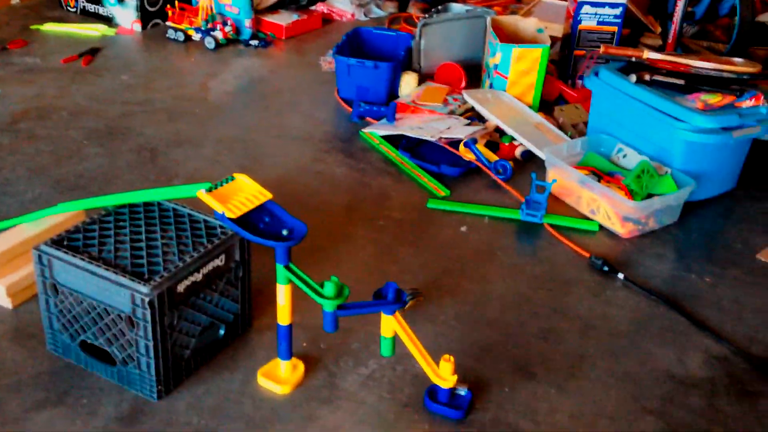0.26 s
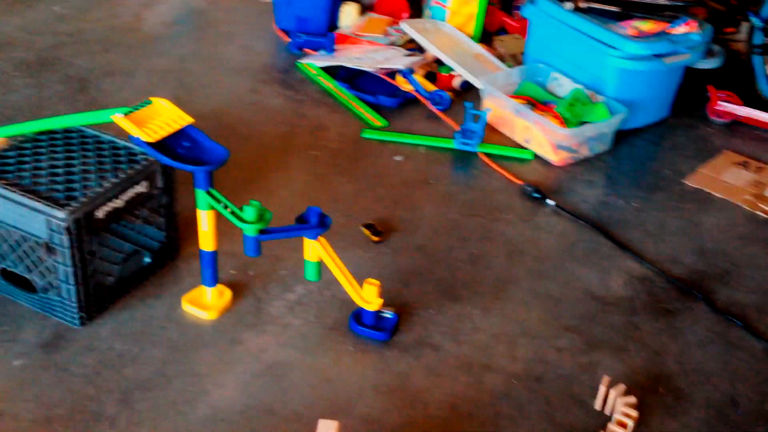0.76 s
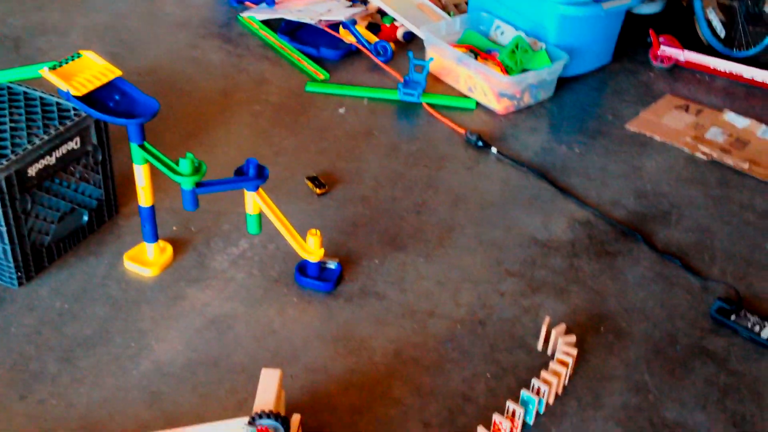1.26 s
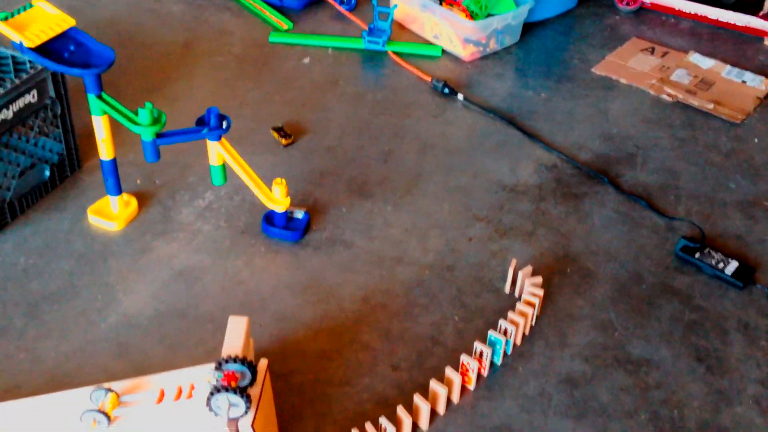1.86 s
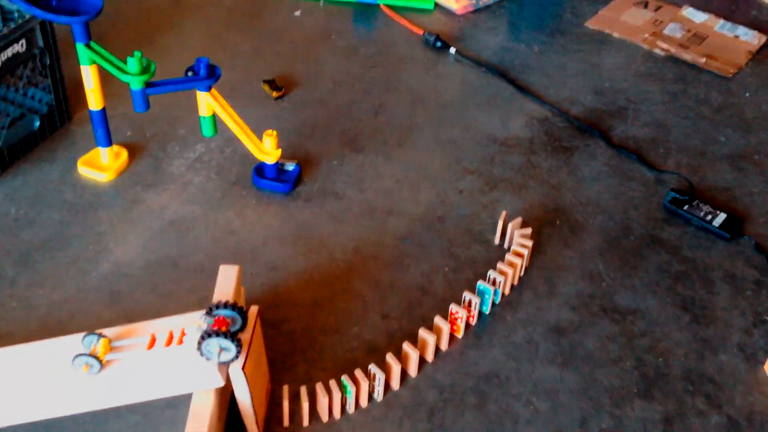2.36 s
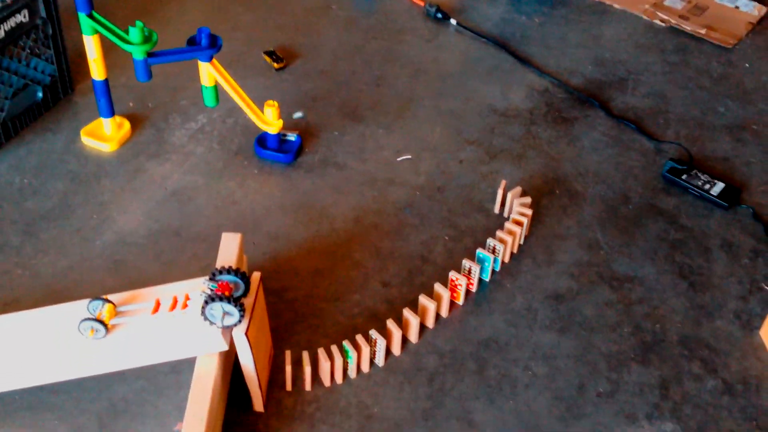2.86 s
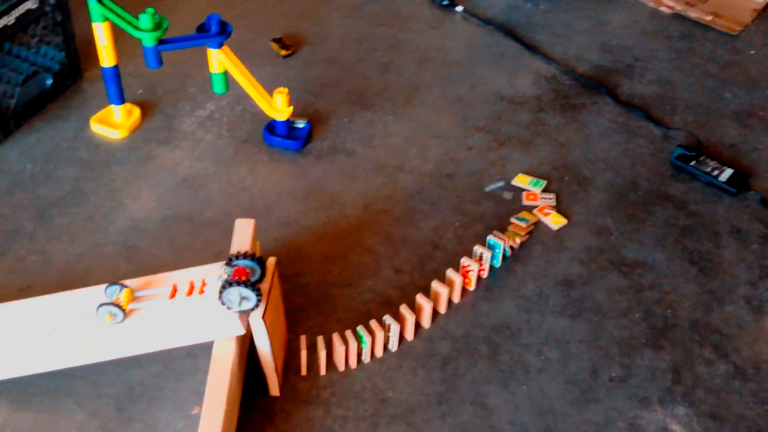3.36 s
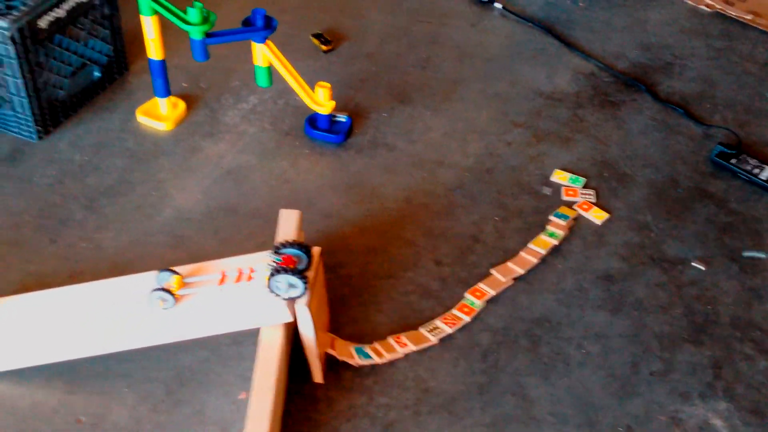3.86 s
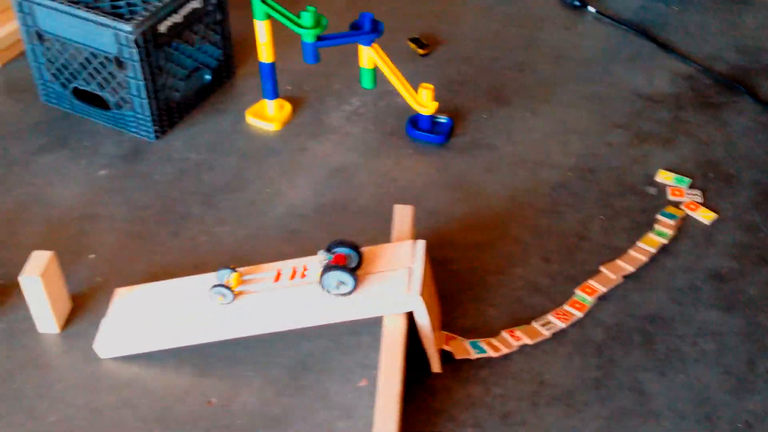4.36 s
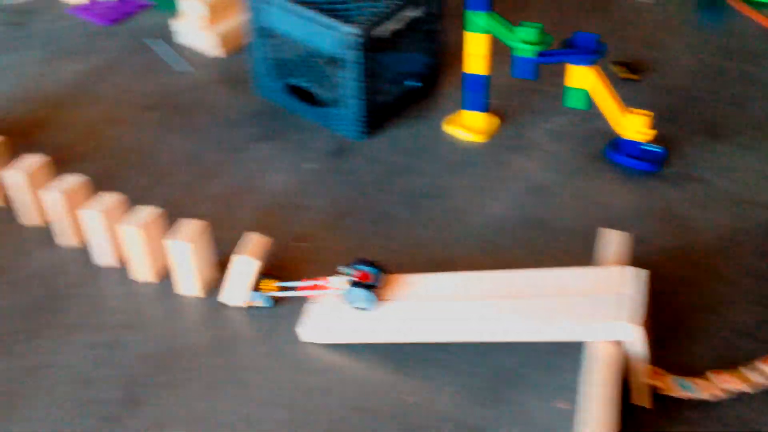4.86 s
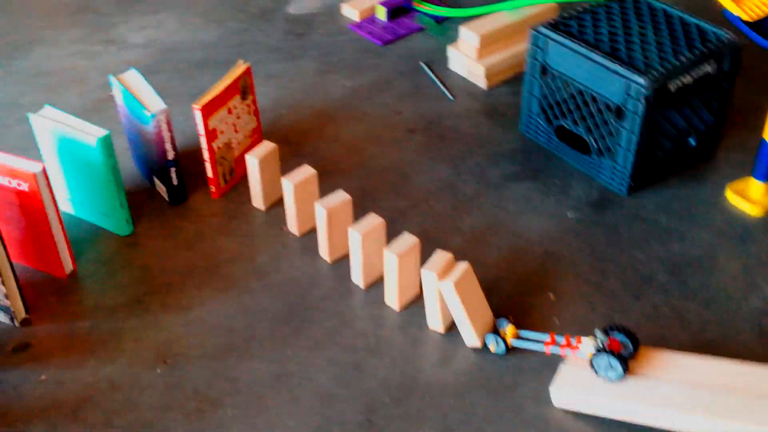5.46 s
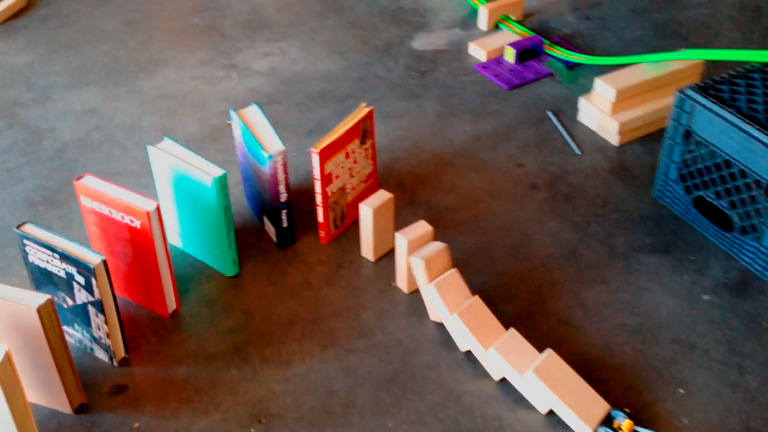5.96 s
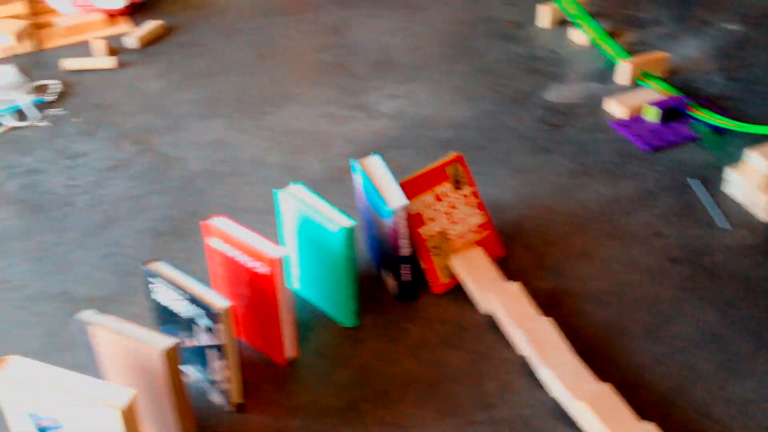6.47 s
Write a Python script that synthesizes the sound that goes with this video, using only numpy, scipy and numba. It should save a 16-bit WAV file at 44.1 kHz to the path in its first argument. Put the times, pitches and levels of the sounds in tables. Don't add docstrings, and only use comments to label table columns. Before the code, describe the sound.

A marble rattles down a hollow plastic run, skitters onto concrete, and sets off clacking dominoes, a nudged toy cart, and loud toppling wooden blocks.

```python
import sys
import numpy as np
from scipy import signal
from scipy.fft import rfft, irfft
from scipy.io import wavfile
from scipy.ndimage import uniform_filter1d
from numba import njit

SR = 44100
rng = np.random.default_rng(int(sys.argv[2]) if len(sys.argv) > 2 else 0)


def dump_mix(stems):
    frames = np.atleast_2d(stems).T
    limited = np.clip(frames, -1, 1)
    pcm = np.round(limited * 32767).astype(np.int16)
    wavfile.write(sys.argv[1], SR, pcm)


def level_to_linear(level):
    exponent = np.asarray(level, float) / 20
    return 10 ** exponent


N = 296793

# (frequency [Hz], width [Hz], level [dB])
LOWER_RUN_MODES = [(321, 25, -11), (1090, 18, 1.5), (1220, 18, -2), (1390, 70, -6.5), (1814, 26, 5.5),
                   (2110, 35, -3.5), (2640, 59, -10.5), (3690, 250, -23.5)]
# (frequency [Hz], level [dB])
PLASTIC_TONE = [(100, -21), (308, -41.5), (525, -16), (1120, -1.5), (1920, -3), (2860, -12.5), (3800, -8),
                (5600, -10.5), (8160, -7.5), (9500, -18.5)]
# (frequency [Hz], level [dB])
THICK_WOOD_TONE = [(100, -71), (400, -6.5), (1000, 10), (1500, 8), (2450, 6.5), (2900, -7), (3800, -16.5),
                   (4500, -40), (6500, -35), (9500, -42)]


def level(x):
    return x / np.sqrt(np.mean(x ** 2))


def peak1(x):
    return x / abs(x).max()


def band(x, lo_hz, hi_hz):
    return signal.sosfilt(signal.butter(4, [lo_hz, hi_hz], "band", fs=SR, output="sos"), x)


def colour(x, points):
    hz, db = np.transpose(points)
    log_hz = np.log(np.arange(1025) * SR / 2048 + 1)
    cepstrum = irfft(np.interp(log_hz, np.log(hz), db) * np.log(10) / 20)
    cepstrum[1:1024] *= 2
    cepstrum[1025:] = 0
    response = irfft(np.exp(rfft(cepstrum)))
    return signal.fftconvolve(x, response)[:len(x)]


def walk(rate_hz, size):
    hold = int(SR / rate_hz)
    steps = np.repeat(rng.standard_normal(size // hold + 1), hold)
    return uniform_filter1d(steps[:size], hold)


def ring(hz, width_hz, t):
    build_up = 1 - np.exp(-t * hz / 0.37)
    return build_up * np.exp(-np.pi * width_hz * t) * np.sin(2 * np.pi * hz * t)


def pings(hits, width_hz, rise_s, beat):
    out, t = np.zeros(N + SR), np.arange(SR // 5) / SR
    decay = np.exp(-np.pi * width_hz * t)
    swell = (1 - np.exp(-t / rise_s)) ** 2
    for s, peak_db, hz in hits:
        neighbour = .5 * decay * np.sin(2 * np.pi * hz * (1 + beat) * t)
        note = np.sin(2 * np.pi * hz * t) + neighbour
        i = int(s * SR)
        out[i:i + len(t)] += level_to_linear(peak_db) * peak1(swell * decay * note)
    return out[:N]


def knocks(hits, modes, tone, crack_s, body_db, own_width_hz, thud_db, ring_db=0):
    contact_s = .0005
    soft_thud = 0.42
    out, t = np.zeros(N + SR), np.arange(SR // 8) / SR
    for s, peak_db, tick_db, hz, *own_db in hits:
        burst = rng.standard_normal(len(t))
        burst[0] = 3.3
        spot = np.clip(rng.standard_normal((len(modes) + 1, 2)), -2, 2) * [3, .02]
        body = sum(level_to_linear(db + shift_db) * ring(f * (1 + detune), 2 * width, t)
                   for (f, width, db), (shift_db, detune) in zip(modes, spot))
        own = ring(hz, own_width_hz, t)
        own = own + .5 * ring(hz * (1 + 2 * spot[-1, 1]), 2 * own_width_hz, t)
        crack = band(colour(burst * np.exp(-t / crack_s), tone), 1300, 4650)
        blow = peak1(crack) + level_to_linear(body_db) * peak1(body) + level_to_linear(ring_db + sum(own_db)) * peak1(own)
        blow = peak1(blow * (1 - np.exp(-t / contact_s)) ** 2)
        thud = peak1(band(burst * np.exp(-t / 0.013), 180, 1300))
        tick = peak1(band(colour(burst * np.exp(-t / 0.0051), tone), 5800, 9200))
        dull_db = thud_db - soft_thud * (peak_db + 17.0)
        i = int(max(s - contact_s, 0) * SR)
        out[i:i + len(t)] += level_to_linear(peak_db) * (blow + level_to_linear(dull_db) * thud + level_to_linear(tick_db) * tick)
    return out[:N]


def rattle(curve, modes, tone, rate_hz, spread_db, body_db, wander_db, tick_db,
           hits=(), jolt_db=-40, fizz_db=-12, settle_s=.05):
    s, db = np.transpose(curve)
    start, stop = int(max(s[0], 0) * SR), min(int(s[-1] * SR), N)
    now, t = np.arange(start, stop) / SR, np.arange(SR // 16) / SR

    chance, sign, size = rng.random((3, N))[:, start:stop]
    size_db = np.minimum(-spread_db * np.log(size + 1e-9), 18)
    taps = (chance < rate_hz / SR) * np.sign(sign - .5) * level_to_linear(size_db)
    body = 0
    for hz, width_hz, mode_db in modes:
        drive = taps * level_to_linear(mode_db + wander_db * walk(13.0, size=N)[start:stop])
        body = body + signal.fftconvolve(drive, np.sqrt(width_hz) * ring(hz, width_hz, t))
    body = body[:len(now)]

    broad = colour(taps, tone)
    mid = level(band(broad, 200, 3500)) + level_to_linear(body_db) * level(body)
    top = level(band(broad, 4200, 12000))
    grit = level(band(taps, 3600, 13000))

    fade_in, fade_out = now - s[0] + (start == 0), s[-1] - now + (stop > N - 300)
    fade = np.clip(np.minimum(fade_in, fade_out) / .01, 0, 1)
    roll = level_to_linear(np.interp(now, s, db) - 1.0)
    stir = [np.clip((now - h[0]) / 0.014, 0, 1) * np.exp(-abs(now - h[0]) / settle_s) * level_to_linear(h[1])
            for h in hits]
    jolt = level_to_linear(jolt_db) * sum(stir)
    fizz = level_to_linear(fizz_db) * sum(e * level_to_linear(h[2]) for e, h in zip(stir, hits))
    out = np.zeros(N)
    out[start:stop] = fade * ((roll + jolt) * level(mid) + level_to_linear(tick_db) * roll * top + fizz * grit)
    return out


def garage():
    # (frequency [Hz], level [dB])
    air_tone = [(24, -65.5), (40, -19), (147, -8.5), (329, -9.5), (463, -13), (699, -9), (899, -14.5),
                (2700, -27), (9500, -30.5), (12400, -73)]
    swell_db = 0.29 * walk(14.0, size=N)
    return level_to_linear(-58.5 + swell_db) * level(colour(rng.standard_normal(N), air_tone))


@njit
def walls(x, lags, gain, damp):
    line, soft, out = np.zeros((8, 4096)), np.zeros(8), np.zeros(len(x))
    for i in range(len(x)):
        total = 0.
        for k in range(8):
            soft[k] += (1 - damp) * (gain[k] * line[k, (i - lags[k]) & 4095] - soft[k])
            total += soft[k]
            out[i] += soft[k] * (1 - 2 * (k % 2))
        for k in range(8):
            line[k, i & 4095] = x[i] + soft[k] - total / 4
    return out


def books():
    # (time [s], peak [dB], tick [dB], own ring [Hz], own ring level [dB])
    cover_hits = [(6.203, -16.5, -20, 309, -9), (6.242, -21.5, -30, 468, 5.5), (6.286, -29.5, -34, 490, 12),
                  (6.331, -40.5, 1, 502, 4), (6.342, -57, -14, 463, 11), (6.421, -40, -21, 450, -7),
                  (6.485, -50, -15, 440, -8)]
    last_fall = [
        (6.707, -12.5, -17, 669, -17),
    ]
    # (time [s], level [dB])
    slide = [(6.21, -38), (6.276, -67), (6.36, -68), (6.482, -50.5), (6.568, -67), (6.73, -42)]
    # (frequency [Hz], width [Hz], level [dB])
    book_modes = [(202, 10.4, 1), (300, 31, 1), (487, 80, 9.5), (608, 50, 9), (790, 340, -52),
                  (1360, 1100, 4), (2050, 190, -3.5)]
    # (frequency [Hz], level [dB])
    paper_tone = [(100, 9), (174, -42), (929, -27), (1360, -18.5), (3030, -19.5), (7700, -15),
                  (9500, -23.5)]
    thumps = knocks(cover_hits + last_fall, book_modes, paper_tone, crack_s=0.0059, body_db=5.4,
                    own_width_hz=19, thud_db=-6.5)
    scrape = rattle(slide, book_modes, paper_tone, rate_hz=4400, spread_db=2.8, body_db=-5.0,
                    wander_db=4.6, tick_db=-0.5)
    return thumps + scrape


def cart():
    # (time [s], peak [dB], tick [dB], own ring [Hz], own ring level [dB])
    board_hits = [
        (3.844, -17.5, -4, 592, 4.3),
        (4.316, -24, -19.5, 2640, 9),
    ]
    chassis_hits = [
        (4.406, -13.5, -17, 900, 0.55),
    ]
    wheel_hits = [(4.513, -39, -9, 2070, -19), (4.568, -55, -26, 2100, -19), (4.6145, -43, -10, 2330, -24),
                  (4.75, -24, -10, 2170, 22), (4.7568, -17, -8, 1480, 5.5)]
    # (time [s], level [dB])
    rolling = [(4.32, -54.5), (4.492, -50.5), (4.742, -49.5), (4.85, -45.5)]
    # (frequency [Hz], width [Hz], level [dB])
    board_modes = [(1170, 200, -25), (1640, 380, 43), (2900, 70, 11)]
    chassis_modes = [(1080, 60, -9), (2250, 120, -5), (2900, 60, -1), (3550, 150, -6), (4900, 130, 0),
                     (7500, 200, -4)]
    cart_modes = [(560, 230, -18), (774, 29, -1.5), (1480, 120, -10), (1990, 71, -20), (2330, 52, -4),
                  (3700, 250, -14)]
    # (frequency [Hz], level [dB])
    plank_tone = [(100, -11), (245, 3.5), (1210, -6.5), (2280, 0), (3150, -10), (8000, 7.5), (9500, -4.5)]
    # (time [s], peak [dB],
    # ring [Hz])
    lingering_notes = [(2.33, -35, 2620), (2.582, -35, 2640), (4.316, -33, 2600), (4.331, -34, 2600),
                       (4.407, -38, 2300)]
    side_notes = [(0.253, -27, 3600), (0.2535, -28, 4900), (2.581, -30, 3850), (4.3155, -29, 1800),
                  (4.316, -32, 3080), (4.406, -30, 3420), (4.406, -31, 2450)]
    board = knocks(board_hits, board_modes, THICK_WOOD_TONE, crack_s=0.0042, body_db=0.85,
                   own_width_hz=60, thud_db=-16.5)
    nudge = knocks(chassis_hits, chassis_modes, plank_tone, crack_s=0.0067, body_db=19.0,
                   own_width_hz=12, thud_db=-20)
    bumps = knocks(wheel_hits, cart_modes, plank_tone, crack_s=0.0069, body_db=-8.0,
                   own_width_hz=260, thud_db=-23.5)
    notes = pings(lingering_notes, width_hz=20, rise_s=.0012, beat=.125)
    notes += pings(side_notes, width_hz=130, rise_s=.0007, beat=.06)
    roll = rattle(rolling, cart_modes, plank_tone, rate_hz=1600, spread_db=2.2, body_db=-10, wander_db=3.3,
                  tick_db=-14.5, hits=wheel_hits, jolt_db=-34, fizz_db=-7.0, settle_s=0.019)
    return level_to_linear(-2.5) * (board + nudge) + notes + bumps + roll


def marble_upper_run():
    # (time [s], peak [dB], tick [dB], own ring [Hz], own ring level [dB])
    upper_hits = [(0.001, -18, 1.5, 3800, -2.5), (0.0119, -34, -17, 1800, -13),
                  (0.1423, -23.5, -7, 7840, 12.5), (0.253, -20, -5, 8080, 13), (0.3481, -30, -11, 1280, 6),
                  (0.37, -16.5, 1, 3700, 11), (0.488, -18, -7, 2080, 4.5), (0.6463, -25.5, -10.5, 1960, -4),
                  (0.714, -24, -27, 1430, 7.5), (0.9393, -29, -16.5, 1960, 1.5),
                  (1.075, -38, -3, 1960, -16), (1.199, -31.5, -31, 1220, -20),
                  (1.2428, -45, -26, 1990, -15), (1.32, -30.5, -9, 1550, -13),
                  (1.3556, -15.5, -15.5, 1960, 4.5), (1.4467, -17.5, -13.5, 1960, -2),
                  (1.4631, -17, -24, 1960, -7)]
    # (time [s], level [dB])
    upper_roll = [(0.0, -28), (0.13, -51.5), (0.42, -38), (0.504, -24.5), (0.738, -33.5), (0.765, -44),
                  (0.9, -42.5),
                  (1.302, -42.5), (1.35, -25.5), (1.461, -28), (1.68, -52)]
    hum_curve = [(0.06, -52), (0.122, -35.5), (0.154, -47.5), (0.33, -48), (0.36, -33)]
    # (frequency [Hz], width [Hz], level [dB])
    upper_modes = [(316, 20, -10), (1199, 19, 0.5), (1590, 40, 6.5), (1737, 22, -3), (1960, 150, 13.5),
                   (2280, 80, -3), (2620, 40, -3), (3800, 300, -14)]
    hum_modes = [(1220, 44, 0)]
    # (time [s], peak [dB], ring [Hz])
    wall_pings = [(0.0115, -31, 1685), (0.4262, -26, 1320), (0.4417, -21.5, 1220), (0.4911, -17, 1630),
                  (0.5192, -25, 1640), (0.5303, -21.0, 1604), (0.553, -29, 1960), (0.597, -24, 1690),
                  (0.6166, -17, 1540), (0.7286, -28, 1610), (0.7439, -27, 1390), (1.3575, -15.5, 1960),
                  (1.3675, -21, 2050.0), (1.3782, -22, 1820), (1.4076, -20, 1540), (1.4245, -29, 1860),
                  (1.4379, -18.5, 2020), (1.4495, -18.5, 1983), (1.457, -25, 1990.0), (1.4707, -22, 1960),
                  (1.5164, -23.5, 1570), (1.5481, -28, 1790)]
    # (time [s], peak [dB], ring [Hz])
    air_booms = [
        (1.322, -41.5, 313),
        (1.405, -45, 309),
        (6.222, -34.5, 452),
        (6.3, -39, 445),
    ]
    upper = knocks(upper_hits, upper_modes, PLASTIC_TONE, crack_s=0.021, body_db=-1.0,
                   own_width_hz=180, thud_db=-23.0)
    upper += pings(wall_pings, width_hz=90, rise_s=0.00025, beat=0.17)
    upper += pings(air_booms, width_hz=8.3, rise_s=0.0036, beat=0.05)
    roll = rattle(upper_roll, upper_modes, PLASTIC_TONE, rate_hz=1300, spread_db=1.9,
                  body_db=-1.5, wander_db=6.3, tick_db=-19.0, hits=upper_hits,
                  jolt_db=-34, fizz_db=-4.0, settle_s=0.024)
    hum = rattle(hum_curve, hum_modes, PLASTIC_TONE, rate_hz=1900, spread_db=6.7, body_db=6.1,
                 wander_db=1.8, tick_db=-51)
    return upper + level_to_linear(-2.0) * roll + hum


def marble_lower_run():
    # (time [s], peak [dB], tick [dB], own ring [Hz], own ring level [dB])
    lower_hits = [(1.815, -56.5, 6.5, 1830, -9), (2.299, -36, -11.5, 1760, 4), (2.3236, -18, -16, 1850, -2),
                  (2.5815, -20, -16, 1780, -8), (2.777, -29.5, -22.5, 2180, -7),
                  (2.799, -27.5, -8, 1254, -5.5), (2.8082, -38, -22.5, 1120, 3.5),
                  (2.8156, -48, -59, 1090, -15)]
    # (time [s], level [dB], hiss [dB])
    rim_scuffs = [
        (1.69, -57, 2.5),
        (2.19, -56, 4.5),
    ]
    # (time [s], level [dB])
    rolling = [(1.62, -58), (1.672, -45), (2.126, -44), (2.31, -46.5), (2.558, -32), (2.76, -38.5),
               (2.82, -47.5), (2.92, -60), (3.03, -50.5)]
    # (time [s], peak [dB], ring [Hz])
    wall_pings = [(2.3263, -27, 1850.0), (2.3333, -20.5, 1880), (2.3484, -20, 1780), (2.3605, -22.5, 1803),
                  (2.5451, -28.5, 1100), (2.5808, -18, 1832), (2.5938, -34, 1830), (2.6015, -31, 1480),
                  (2.6441, -26.5, 1710), (2.7979, -31.5, 1310), (2.8078, -31, 1040), (2.8235, -30, 1120),
                  (2.8386, -33, 1090.0)]
    lower = knocks(lower_hits, LOWER_RUN_MODES, PLASTIC_TONE, crack_s=0.0086, body_db=-12.5,
                   own_width_hz=120, thud_db=-23)
    lower += pings(wall_pings, width_hz=59, rise_s=0.00049, beat=0.23)
    roll = rattle(rolling, LOWER_RUN_MODES, PLASTIC_TONE, rate_hz=1500, spread_db=1.8, body_db=-0.99,
                  wander_db=7.2, tick_db=-23.5, hits=lower_hits + rim_scuffs,
                  jolt_db=-2.7, fizz_db=4.9, settle_s=0.026)
    return lower + level_to_linear(-3.5) * roll


def marble_on_floor():
    # (time [s], peak [dB], tick [dB], own ring [Hz], own ring level [dB])
    bounces = [(3.0404, -32, -45.5, 706, 0.5), (3.048, -32, 2, 4700, 2), (3.056, -32.5, -4, 8540, 6.5),
               (3.0627, -24, -18.5, 4980, 6.5), (3.0802, -33.5, 5.5, 4400, 5.5)]
    # (time [s], level [dB])
    skitter_curve = [(3.042, -53), (3.082, -45), (3.12, -42.5), (3.21, -52.5)]
    # (time [s], peak [dB], ring [Hz])
    dead_taps = [(3.0316, -44, 1100), (3.0396, -26, 1000), (3.048, -34, 1800), (3.0565, -37, 1420),
                 (3.0725, -32, 3300), (3.08, -30, 4200), (5.253, -29, 2200), (5.2535, -29, 1400),
                 (6.4225, -39, 1700), (6.485, -44, 3900), (6.506, -42, 1350)]
    floor = knocks(bounces, LOWER_RUN_MODES, PLASTIC_TONE, crack_s=0.0063, body_db=-15.5,
                   own_width_hz=120, thud_db=-15.0)
    floor += pings(dead_taps, width_hz=450, rise_s=0.00022, beat=.4)
    skitter = rattle(skitter_curve, LOWER_RUN_MODES, PLASTIC_TONE, rate_hz=1700, spread_db=1.9, body_db=-12,
                     wander_db=0.9, tick_db=-0.5, hits=bounces, jolt_db=-21.0, fizz_db=-5.5, settle_s=0.024)
    return floor + level_to_linear(-3.0) * skitter


def blocks():
    # (time [s], peak [dB], tick [dB], own ring [Hz])
    first_taps = [
        (5.208, -52, -23, 3970),
        (5.2528, -27, -28, 3700),
        (5.2775, -35, -32.5, 3640),
        (5.3006, -43, -29.5, 3630),
    ]
    block_hits = [(5.6829, -11.5, -30.5, 3670), (5.693, -23.5, -47.5, 3870), (5.808, -15, -23, 3830),
                  (5.845, -15, -34, 3960), (5.918, -7, -26, 3940), (5.9458, -16, -46, 3860),
                  (6.0132, -1, -31, 3790), (6.025, -8, -31, 3800), (6.0797, -12.5, -22, 2450),
                  (6.105, -3.5, -39, 3800), (6.1177, -3.5, -19.5, 3820), (6.1592, -13, -33, 3800),
                  (6.168, -11, -47, 3700), (6.1773, -13.5, -20, 3880)]
    # (time [s], level [dB])
    slide_curve = [(5.63, -71), (5.72, -57), (5.864, -46), (6.006, -37.5), (6.056, -39), (6.13, -33.5),
                   (6.3, -45.5)]
    # (frequency [Hz], width [Hz], level [dB])
    block_modes = [(825, 33, -28), (1264, 170, -28.5), (1390, 120, 13), (1540, 150, 28.5), (2100, 46, 10),
                   (2434, 390, -19), (6200, 150, -34), (6520, 140, -9)]
    # (time [s], peak [dB], ring [Hz])
    low_notes = [(5.6829, -18.5, 1490), (5.6917, -24, 1400), (5.703, -25, 1820), (5.8087, -22, 1430),
                 (5.828, -32.0, 1800), (5.8458, -27, 1390), (5.917, -17, 1540.0), (5.9381, -21, 1420),
                 (5.9465, -19.5, 1290), (5.961, -35, 1480.0), (6.0126, -10.5, 1264), (6.024, -23, 1170.0),
                 (6.0459, -31.5, 1580), (6.0668, -24, 1400.0), (6.0795, -10.5, 1390), (6.1063, -16, 1400),
                 (6.1183, -10.5, 1250), (6.1282, -15, 1480), (6.1567, -14, 1350), (6.1674, -16, 1500),
                 (6.18, -23, 1340), (6.2052, -15.5, 1370), (6.2419, -19, 1390.0), (6.2642, -22.5, 1360.0)]
    upper_notes = [(5.6835, -21, 3740), (5.8469, -42, 6100), (5.9163, -40.5, 5530), (5.948, -23.5, 3850),
                   (6.0815, -36, 5550), (6.1061, -33, 5940), (6.12, -34, 5660), (6.1302, -38, 6800),
                   (6.1662, -31.5, 5570)]
    tap = knocks(first_taps, block_modes, THICK_WOOD_TONE, crack_s=0.0036, body_db=2.4,
                 own_width_hz=81, thud_db=-15.5, ring_db=-5)
    falls = knocks(block_hits, block_modes, THICK_WOOD_TONE, crack_s=0.0031, body_db=3.3,
                   own_width_hz=117, thud_db=-12.5, ring_db=-3)
    notes = pings(low_notes, width_hz=190, rise_s=0.00031, beat=0.47)
    notes += pings(upper_notes, width_hz=85, rise_s=0.0003, beat=0.02)
    slide = rattle(slide_curve, block_modes, THICK_WOOD_TONE, rate_hz=500, spread_db=2.5, body_db=-24.0,
                   wander_db=2.8, tick_db=-41, hits=block_hits, jolt_db=-22.0, fizz_db=-13.5, settle_s=0.023)
    return level_to_linear(-5) * tap + level_to_linear(-3.5) * falls + notes + level_to_linear(-0.5) * slide


def dominoes():
    # (time [s], peak [dB], tick [dB], own ring [Hz])
    tile_hits = [(3.089, -18.5, -14, 4400), (3.0985, -9.5, -25.5, 4290), (3.2181, -5.5, -7, 4170),
                 (3.2393, -22.5, -7.5, 4464), (3.258, -9.5, 1, 4770), (3.259, -10, -17, 8840),
                 (3.269, -10, -2, 8500), (3.274, -15.5, -15.5, 4520), (3.284, -25, -20, 4400),
                 (3.3219, -19, 5, 4400), (3.3314, -24.5, -7.5, 4400), (3.3504, -13, -8, 4285),
                 (3.428, -14, -4, 4530), (3.468, -9, -8.5, 4410), (3.5129, -10, -20.5, 4340),
                 (3.554, -29.5, 7.5, 4300), (3.5659, -17.5, 3, 7730), (3.5849, -8.5, -21.5, 3980),
                 (3.6222, -9, -25.5, 4370), (3.6585, -15.5, -20, 4290), (3.748, -21.5, -4, 4400),
                 (3.7757, -28, -16, 4300), (3.806, -35, 1, 4400), (3.8176, -25, 2.5, 4330),
                 (3.916, -21.5, -17, 4700), (3.9775, -40, -2, 4260), (4.0657, -39.5, 0.5, 4760),
                 (4.1086, -36.5, -5.5, 4630), (4.126, -55, -3, 4550), (4.244, -49, -8, 3800)]
    # (time [s], level [dB])
    chatter_curve = [(3.215, -23), (3.227, -18.5), (3.285, -21), (3.325, -30.5), (3.335, -19.5),
                     (3.385, -19.5), (3.42, -51)]
    run_curve = [(3.21, -32.5), (3.402, -37), (3.578, -31), (3.784, -36), (3.926, -42), (4.034, -53),
                 (4.15, -62), (4.3, -62)]
    # (frequency [Hz], width [Hz], level [dB])
    tile_modes = [(3950, 200, -27.5), (4170, 120, -4), (4400, 51, 6), (4290, 80, -10.5), (4840, 130, -9.5)]
    # (frequency [Hz], level [dB])
    thin_wood_tone = [(100, -50.5), (700, -25.5), (1800, -14.5), (2900, -16), (4300, -4.5), (5600, -14),
                      (7000, -8.5), (8500, -5), (9500, -12)]
    # (time [s], peak [dB], ring [Hz])
    small_contacts = [(3.2179, -11, 4540), (3.2217, -11, 4400), (3.2272, -20, 4550), (3.2342, -23, 4350),
                      (3.2419, -16.5, 4360.0), (3.2558, -14.5, 4530), (3.2651, -15, 3870),
                      (3.2732, -12, 4420), (3.282, -15, 4440), (3.3181, -18, 4435), (3.3322, -13.5, 4484),
                      (3.3456, -13.5, 4634), (3.35, -13.5, 4400), (3.3575, -21.5, 4330), (3.369, -18, 4400),
                      (3.4677, -12.5, 4427), (3.4752, -18.5, 4320), (3.4913, -26.5, 4460),
                      (3.5117, -15, 4380), (3.5537, -17.5, 4270), (3.5668, -19, 3636), (3.5867, -18, 4425),
                      (3.5905, -21.5, 3990), (3.6265, -19.5, 4730), (3.6341, -19, 3800),
                      (3.6436, -19, 4380), (3.6573, -23.5, 4280), (3.6632, -15.5, 4110),
                      (3.7137, -25, 4070), (3.749, -23, 4480), (3.7545, -25, 4400), (3.7639, -21.5, 4290.0),
                      (3.7788, -24.5, 4380), (3.8088, -22, 4290), (3.8178, -24.5, 4160),
                      (3.8328, -28, 4310.0), (3.8453, -23.5, 4290), (3.8665, -31, 4290),
                      (3.919, -27.5, 4430), (3.9278, -29.5, 4330)]
    edge_nicks = [(0.4875, -20, 8130), (0.666, -28, 6040), (2.8, -25, 7600), (2.815, -27, 7000),
                  (3.0566, -28, 7860.0), (3.0633, -27.5, 8660.0), (3.0733, -25.5, 9060),
                  (3.0803, -25.5, 6790.0), (3.2186, -9, 6710.0), (3.2598, -9, 8670), (3.2675, -14, 8470),
                  (3.2742, -15.5, 8790), (3.3211, -16.5, 8700.0), (3.3349, -21.5, 8720.0),
                  (3.4684, -16.5, 5960), (3.5539, -26.5, 6880.0), (3.5671, -11.5, 7870),
                  (3.7794, -24.5, 6310.0), (3.9169, -25, 9450), (3.9774, -35, 6800), (4.316, -45, 6700),
                  (4.3165, -43, 4270), (4.5665, -40, 4570), (4.6144, -38, 4870)]
    clacks = knocks(tile_hits, tile_modes, thin_wood_tone, crack_s=0.0043, body_db=-26.5,
                    own_width_hz=100, thud_db=-28.0)
    notes = pings(small_contacts, width_hz=140, rise_s=0.00044, beat=0.033)
    notes += pings(edge_nicks, width_hz=720, rise_s=0.00061, beat=0.087)
    chatter = rattle(chatter_curve, tile_modes, thin_wood_tone, rate_hz=900, spread_db=2.2, body_db=21,
                     wander_db=3.5, tick_db=-13.5)
    run = rattle(run_curve, tile_modes, thin_wood_tone, rate_hz=1100, spread_db=1.6, body_db=-13.0,
                 wander_db=4, tick_db=-8.0, hits=tile_hits, jolt_db=-47.0, fizz_db=-13.5, settle_s=0.033)
    return level_to_linear(-4.5) * clacks + notes + level_to_linear(-3.5) * chatter + level_to_linear(-3.0) * run


def scene():
    marble = marble_upper_run() + marble_lower_run() + marble_on_floor()
    far = marble + dominoes() + cart() + books()
    near = blocks()
    toys, sent = band(np.array([far + near, far + level_to_linear(-5) * near]), 130, 12000)
    lags = np.array([331, 457, 593, 761, 919, 1103, 1327, 1549])
    t60_s, damp = .37, 0.096
    echo = walls(sent + 1e-18, lags, level_to_linear(-60 * lags / SR / t60_s), damp)
    return (toys + level_to_linear(-14) * echo + garage())[None]


def band_limit(x):
    return signal.sosfilt(signal.butter(12, 10330, fs=SR, output="sos"), x)


def record(dry):
    top_hz = 9300
    x = signal.sosfilt(signal.butter(3, 110, "high", fs=SR, output="sos"), dry)
    x = signal.sosfilt(signal.ellip(8, .5, 45, top_hz, fs=SR, output="sos"), x)
    x = signal.sosfilt(signal.butter(10, 1.05 * top_hz, fs=SR, output="sos"), x)
    x = x + .05 * x ** 2
    return band_limit(x)


dry = scene()
out = record(dry)
dump_mix(out)
```